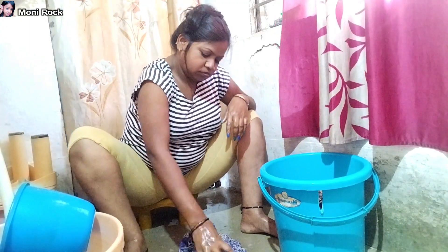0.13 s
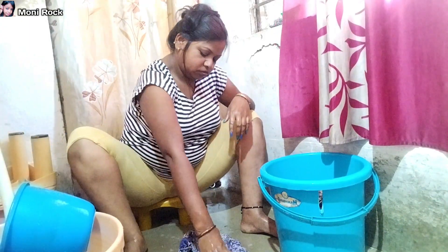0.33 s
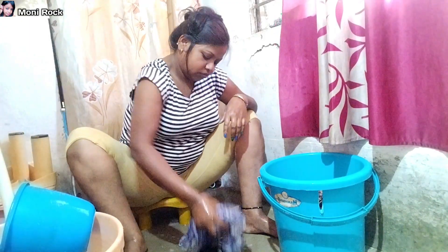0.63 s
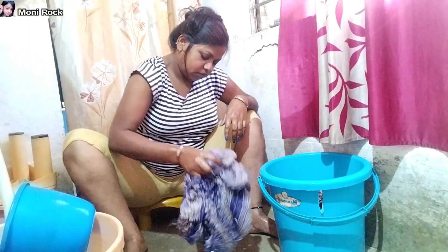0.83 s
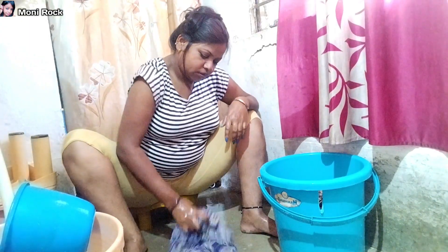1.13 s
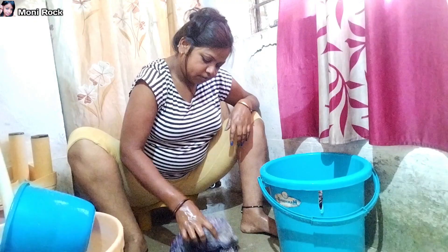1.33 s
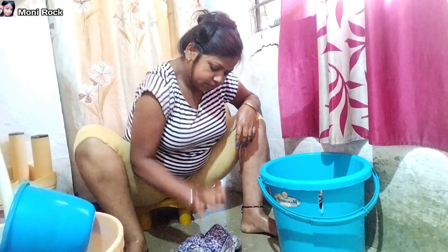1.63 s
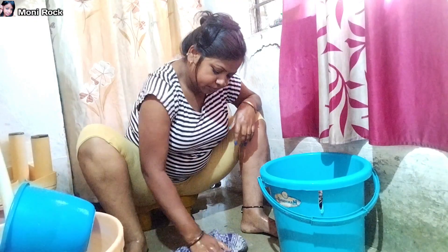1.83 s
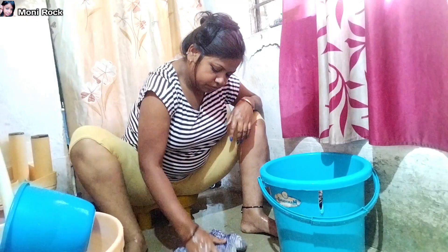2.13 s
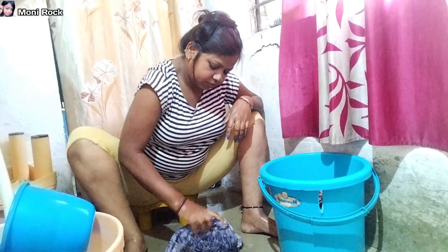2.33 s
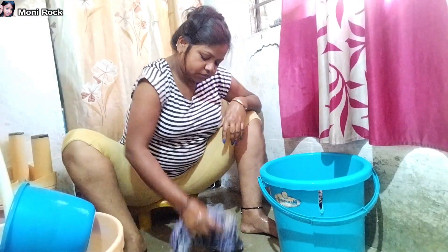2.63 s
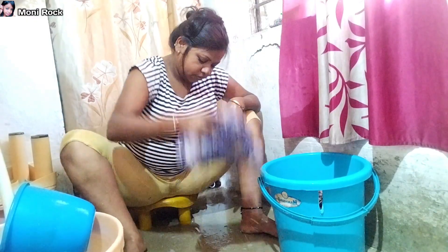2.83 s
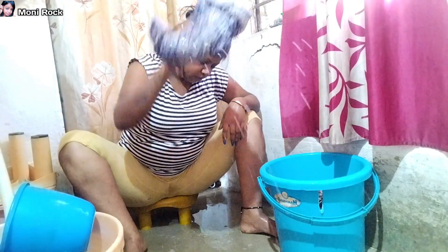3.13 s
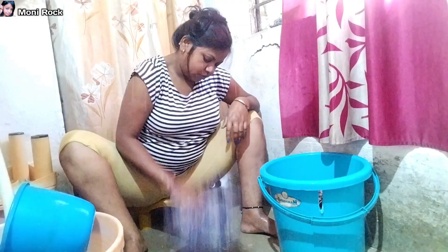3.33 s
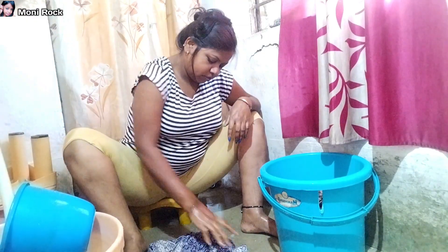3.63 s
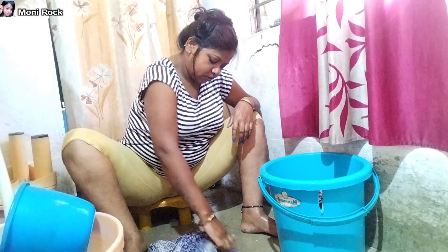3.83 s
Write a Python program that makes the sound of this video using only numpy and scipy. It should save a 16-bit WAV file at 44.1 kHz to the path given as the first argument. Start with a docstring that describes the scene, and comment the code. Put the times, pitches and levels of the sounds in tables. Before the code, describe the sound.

Wet cloth on concrete in a small hard room with a faint steady hum. Soft squelches and tiny drips lead to a faint thin whistle and light, dull drop around 1.1 s. A clear wet slap follows at 1.7 s, then squelching, tiny squeaks near 2.2 s and water spits. The loudest, splattery smack hits at 3.4 s, with hollow ringing and low booming; a dull small knock and squelch end it at 3.9 s.

```python
"""Wet cloth on a concrete floor

A wet cloth is dropped, slapped and then flung hard onto a wet concrete floor in a small washing room.
Slaps, squelches, drips, two cloth squeaks and a dull last knock are coloured grains with hard-room tails.
Sines add rings and thuds; shaped noise booms low after the last throw and makes the humming room.
A thin whistle, a sine times slow noise, leads up to the drop, and a resonance lifts the microphone's treble."""
import sys
import numpy as np
from scipy import signal
from scipy.fft import rfft, irfft
from scipy.io import wavfile

SR = 44100
rng = np.random.default_rng(int(sys.argv[2]) if len(sys.argv) > 2 else 0)


def transcribe(signal):
    """Save signal, clipped to [-1, 1], as a 16-bit WAV file at the path in sys.argv[1]."""
    frames = np.atleast_2d(signal).T
    limited = np.clip(frames, -1, 1)
    pcm = np.round(limited * 32767).astype(np.int16)
    wavfile.write(sys.argv[1], SR, pcm)


N = 176400  # 4 s

# The cloth landing. Each row: start in seconds, swell in seconds, fade t60 in seconds, level in dB,
# bass edge in Hz, treble tilt in dB per octave.
SLAPS = [(1.127, 0.0068, 0.25, -46, 260, 3.5), (1.158, 0.013, 0.14, -45.5, 257, 2.6),
         (1.186, 0.012, 0.1, -49.5, 200, 5.3), (1.7358, 0.0031, 0.16, -29, 243, 2.3),
         (3.4094, 0.0089, 0.15, -19.5, 110, 1.5)]
# Tone of the splatter. Each row: frequency in Hz, relative gain in dB.
SLAP_COLOUR = [(30, -1), (100, -22.5), (180, 5.5), (320, -3), (520, 2.5), (660, -5.5), (770, -2),
               (1000, -5), (1350, -3.5), (2100, -8), (3000, -14), (4200, -13.5), (5000, -18.5), (5600, -18),
               (6600, -16.5), (7500, -18.5), (8700, -17), (10100, -18), (11500, -20), (15500, -22.5)]
# Hollow things and room corners that ring with each slap. Each row: frequency in Hz,
# level in dB against the slap ahead of its bass cut, t60 in seconds.
RINGS = [(177.7, -16, 0.51), (231, -22, .55), (314, -13, 0.46), (412, -23.5, 0.78), (511, -12, 0.36),
         (570, -18.5, 0.44), (638, -8.5, 0.18)]
# Air trapped under the cloth, popping as it flattens. Each row: start in seconds, frequency in Hz,
# level in dB, t60 in seconds.
POCKETS = [(1.736, 108, -36.5, 0.031), (1.737, 336, -26.5, 0.026), (3.412, 71, -24, 0.059),
           (3.428, 521.6, -26, 0.15)]
# The hand gathers and presses the cloth. Each row: start in seconds, swell in seconds,
# fade t60 in seconds, level in dB, treble tilt in dB per octave.
SQUELCHES = [(0, 0.14, 0.23, -70.5, 2.5), (.42, 0.093, 1, -65.5, -1), (0.651, 0.03, 0.2, -65, 2.5),
             (1.33, 0.026, 0.38, -68.5, 6.5), (1.89, 0.028, 0.43, -63.5, 0.5), (2.113, 0.02, 0.6, -61.5, 1),
             (2.493, 0.0056, 0.45, -61, 1), (2.619, 0.041, 0.32, -65.5, 1),
             (3.787, 0.0045, 0.94, -61.5, -0.5), (3.93, 0.015, 0.23, -55, 1.2)]
# Tone of the squelching. Each row: frequency in Hz, relative gain in dB.
SQUELCH_COLOUR = [(100, -1.5), (500, -3), (1500, -3.5), (3800, -8.5), (5500, -14), (9000, -11.5),
                  (15500, -18.5)]
# Drips and spits of water, two small cloth squeaks (2.173 and 2.192 s) and a dull last knock (3.945 s).
# Each row: start in seconds, level in dB, centre in Hz, width to either side in octaves, t60 in seconds.
SHORT_BURSTS = [(.3744, -64, 11000, 0.55, .03), (.7771, -57, 13950, .12, 0.028),
                (.8235, -58, 10900, 0.51, 0.068), (0.981, -60, 9700, .4, 0.053),
                (2.0925, -66.5, 9200, .1, 0.12), (2.114, -56.5, 9900, 0.77, 0.13),
                (2.134, -46.5, 9400, 0.34, 0.024), (2.148, -57.5, 9000, 0.17, 0.045),
                (2.173, -60, 3470, 0.44, .16), (2.192, -66, 4400, .1, .12),
                (2.384, -52, 10500, 0.15, 0.051), (2.6913, -66.5, 8100, 0.23, 0.037),
                (2.8459, -65.5, 8200, 0.22, 0.11), (2.9487, -57, 10300, 0.38, 0.023),
                (3.0061, -61, 9600, 0.92, .02), (3.0897, -56, 6900, 0.16, 0.093),
                (3.0886, -55.5, 4160, 0.55, 0.075), (3.1455, -62, 9500, 0.61, 0.037),
                (3.2538, -55, 9200, 0.14, 0.061), (3.294, -61, 9050, 0.54, .02),
                (3.331, -62, 11000, 0.44, 0.052), (3.3506, -52.5, 9900, 0.78, 0.077),
                (3.3767, -50.5, 10100, 0.66, 0.18), (3.4186, -20, 9700, 0.5, 0.013),
                (3.945, -50, 620, 0.22, .14)]
# Low booming swells after the last throw. Each row: start in seconds, swell in seconds,
# fade t60 in seconds, level in dB.
BOOMS = [(3.411, 0.039, 0.41, -35.5), (3.516, 0.032, 0.28, -34.5), (3.646, 0.035, 0.2, -46)]
# Tone of the booms, strongest near 36 Hz. Each row: frequency in Hz, relative gain in dB.
BOOM_COLOUR = [(10, -18), (24, -14), (36, 10), (60, -6), (90, -15), (140, -21), (400, -57), (2000, -90)]
# A faint thin whistle while the cloth hangs. Each row: time in seconds, pitch in Hz, level in dB.
WHISTLE = [(.95, 7300, -77), (1.0, 6800, -77), (1.05, 6600, -74), (1.13, 6500, -72)]
# Hum bands of the room. Each row: centre in Hz, half-width in Hz, level in dB.
HUMS = [(344.1, 4.3, -63.5), (339, 29.5, -61.5), (289.4, 5, -67), (843, 7.3, -72), (949, 25, -71),
        (1053, 16, -72)]
# Tone of the room air. Each row: frequency in Hz, relative gain in dB.
AIR = [(10, 0.5), (30, -3), (70, 4), (120, -9), (170, -4.5), (250, -10), (400, -7), (520, -11), (750, -14),
       (1000, -16), (1600, -18.5), (2500, -25.5), (4000, -30), (6000, -36), (9000, -35.5), (15500, -38)]
# How long the room's tail lasts. Each row: frequency in Hz, t60 in seconds.
ROOM_T60 = [(60, 0.85), (200, 0.42), (500, 0.42), (1500, 0.36), (4000, 0.33), (9000, 0.26), (15000, 0.28)]

SPLATS_PER_S, SPLAT_SPREAD_DB = 9000, 2
SQUELCH_GRAINS_PER_S, SQUELCH_SPREAD_DB = 2000, 4
AIR_DB = -55
SLAP_WET_DB, BURST_WET_DB, SQUELCH_WET_DB = -4.5, -9, 1  # room tail levels
MIC_HZ, MIC_WIDTH_HZ, MIC_BOOST_DB = 9000, 1140, 12.5
EDGE_HZ = 15550  # top of the recorded band
FREQS = np.fft.rfftfreq(8192, 1 / SR)  # Hz, where colours are drawn


def amp(db):
    """Decibels to gain."""
    return 10 ** (np.asarray(db) / 20)


def unit(x):
    """Scales to rms 1."""
    return x / np.sqrt(np.mean(x ** 2) + 1e-20)


def read(points, hz):
    """Reads a table on a log-frequency axis."""
    f, value = np.transpose(points)
    return np.interp(np.log(hz + 1), np.log(f), value)


def add(mix, start, sound):
    """Mixes a sound in at a start time in seconds, cut off at the end of the mix."""
    part = mix[max(round(start * SR), 0):][:len(sound)]
    part += sound[:len(part)]


def colour(x, db):
    """Minimum-phase filter of unit energy shaped by the dB curve at FREQS, so onsets stay sharp."""
    log_gain = np.log(amp(np.maximum(db - db.max(), -90)))
    circle = np.concatenate([log_gain, log_gain[-2:0:-1]])
    spectrum = np.exp(np.conj(signal.hilbert(circle)))
    taps = np.fft.ifft(spectrum).real[:len(FREQS)]
    return signal.fftconvolve(x, taps / np.linalg.norm(taps))


def noise(gain):
    """Noise of rms 1 with the spectrum gain(hz)."""
    spectrum = rfft(rng.standard_normal(N))
    return unit(irfft(spectrum * gain(np.fft.rfftfreq(N, 1 / SR)), N))


def swell(rise, t60):
    """One second of straight rise, then exponential fade."""
    t = np.arange(SR) / SR
    attack = np.minimum(t / max(rise, 1e-4), 1)
    return attack * amp(-60 * np.maximum(t - rise, 0) / t60)


def grains(rate, spread_db):
    """One second of single-sample clicks, random in time, sign and size, at rms 1."""
    size = amp(spread_db * np.minimum(rng.exponential(1, SR), 4))
    sign = rng.choice([-1, 1], SR)
    return unit(size * sign * (rng.random(SR) < rate / SR))


def tilt(db_per_octave, pivot_hz=800):
    """Brightens or dulls above the pivot."""
    return db_per_octave * np.log2(1 + FREQS / pivot_hz)


def room(x, wet_db, count=3):
    """Small hard room: random reflections die band by band, the source turning among several tails."""
    out = x.copy()
    t = np.arange(N) / SR
    for k in range(count):
        # sparse reflections, the first after 4 ms
        taps = rng.choice([-1., 1.], SR) * (rng.random(SR) < 8000 / SR) * (np.arange(SR) > .004 * SR)
        hz, frame_s, bands = signal.stft(taps, SR, nperseg=256)
        decay = amp(-60 * frame_s / read(ROOM_T60, hz)[:, None])
        tail = signal.istft(bands * decay, SR, nperseg=256)[1]
        # the feed goes round all the tails every 30 ms
        share = np.maximum(np.cos(2 * np.pi * (t / .03 + k / count)), 0) * 2 / np.sqrt(count)
        out += amp(wet_db) * signal.fftconvolve(x * share, tail / np.linalg.norm(tail))[:N]
    return out


def slaps():
    """Fold after fold hits the water film: a dense splatter that sets nearby hollows ringing."""
    out, t = np.zeros(N), np.arange(SR) / SR
    for start, rise, t60, db, edge_hz, tilt_db in SLAPS:
        bass_db = -10 * np.log10(1 + (edge_hz / (FREQS + 1)) ** 4)
        splatter = grains(SPLATS_PER_S, SPLAT_SPREAD_DB) * swell(rise, t60)
        tone_db = read(SLAP_COLOUR, FREQS) + bass_db + tilt(tilt_db)
        add(out, start, amp(db) * colour(splatter, tone_db))
    out = room(out, SLAP_WET_DB)
    # rings stay dry, with the same bass cut as their slap
    for start, rise, _, db, edge_hz, _ in SLAPS:
        for hz, ring_db, t60 in RINGS:
            strength = amp(db + ring_db) / np.hypot(1, (edge_hz / hz) ** 2)
            tone = np.sin(2 * np.pi * (hz * t + rng.random()))
            add(out, start, strength * swell(2 * rise, t60) * tone)
    return out


def pockets(rise=0.0045, wet_db=-7):
    """Trapped air gives the two hard slaps a short hollow thud of fading sines."""
    out, t = np.zeros(N), np.arange(SR) / SR
    for start, hz, db, t60 in POCKETS:
        add(out, start, amp(db) * swell(rise, t60) * np.sin(2 * np.pi * hz * t))
    return room(out, wet_db)


def squelches():
    """Water fizzes out of the weave under the hand."""
    out = np.zeros(N)
    for start, rise, t60, db, tilt_db in SQUELCHES:
        fizz = grains(SQUELCH_GRAINS_PER_S, SQUELCH_SPREAD_DB) * swell(rise, t60)
        add(out, start, amp(db) * colour(fizz, read(SQUELCH_COLOUR, FREQS) + tilt(tilt_db)))
    return room(out, SQUELCH_WET_DB)


def short_bursts(rise=0.00043, grains_per_s=6000, spread_db=3):
    """Drips and spits, two cloth squeaks and a dull last knock, all as short bands of grains."""
    out = np.zeros(N)
    for start, db, hz, octaves, t60 in SHORT_BURSTS:
        band_db = -20 * np.log10(1 + (np.log2((FREQS + 1) / hz) / octaves) ** 2)
        burst = grains(grains_per_s, spread_db) * swell(rise, t60)
        add(out, start, amp(db) * colour(burst, band_db))
    return room(out, BURST_WET_DB)


def booms():
    """Low noise swells near 36 Hz, as a curtain or the room resonates after the last throw."""
    out = np.zeros(N)
    for start, rise, t60, db in BOOMS:
        shape = swell(rise, t60)
        boom = shape * noise(lambda f: amp(read(BOOM_COLOUR, f)))[:SR]
        # slow noise varies in strength, so give each boom the energy of its swell
        add(out, start, amp(db) * boom * np.linalg.norm(shape) / np.linalg.norm(boom))
    return out


def whistle(half_width_hz=70):
    """A narrow, falling hiss: a gliding sine multiplied by slow noise."""
    t = np.arange(N) / SR
    time_s, hz, db = np.transpose(WHISTLE)
    tone = np.sin(2 * np.pi * np.cumsum(np.interp(t, time_s, hz)) / SR)
    level = np.interp(t, time_s, amp(db), 0, 0)
    return level * tone * noise(lambda f: 1 / (1 + (f / half_width_hz) ** 2))


def background():
    """Steady room noise with a wavering hum, as of a fan, made of narrow noise bands."""
    hum = np.zeros(N)
    for hz, half_width, db in HUMS:
        hum += amp(db) * noise(lambda f: 1 / (1 + ((f - hz) / half_width) ** 2))
    return hum + amp(AIR_DB) * noise(lambda f: amp(read(AIR, f)))


def scene():
    """All sources at one microphone."""
    cloth = slaps() + pockets() + squelches() + short_bursts()
    return (cloth + booms() + whistle() + background())[None]


def record(dry):
    """The microphone's treble resonance, then the band limit."""
    b, a = signal.iirpeak(MIC_HZ, MIC_HZ / MIC_WIDTH_HZ, SR)
    bright = dry + (amp(MIC_BOOST_DB) - 1) * signal.lfilter(b, a, dry)
    low_pass = signal.firwin(511, EDGE_HZ, window=("kaiser", 9), fs=SR)
    return signal.oaconvolve(bright, low_pass[None], "same")


dry = scene()
out = record(dry)
transcribe(out)
```